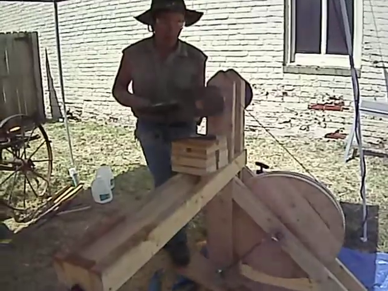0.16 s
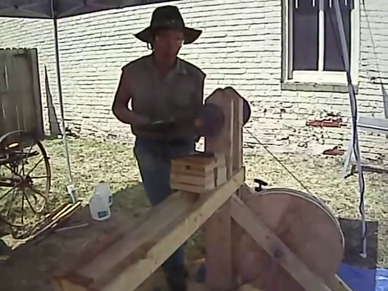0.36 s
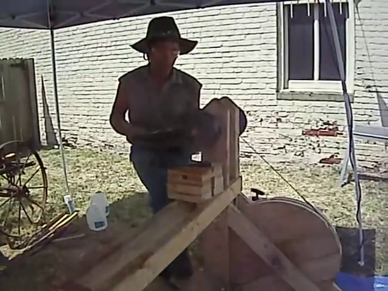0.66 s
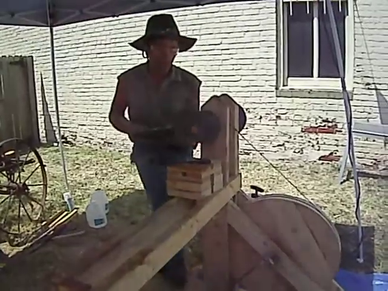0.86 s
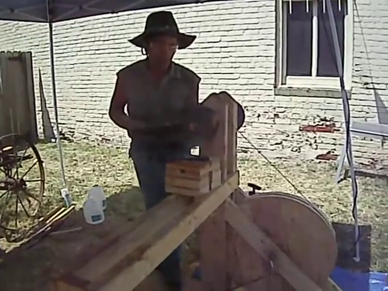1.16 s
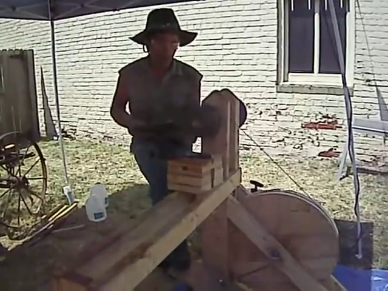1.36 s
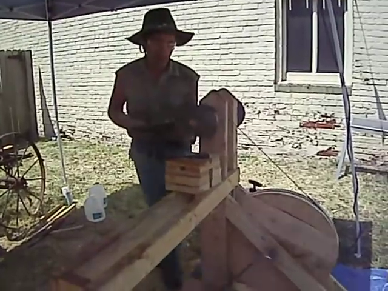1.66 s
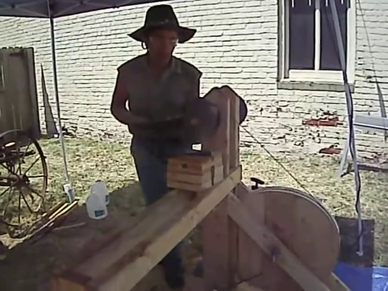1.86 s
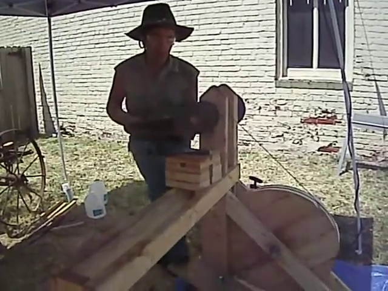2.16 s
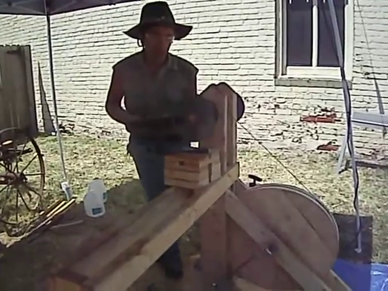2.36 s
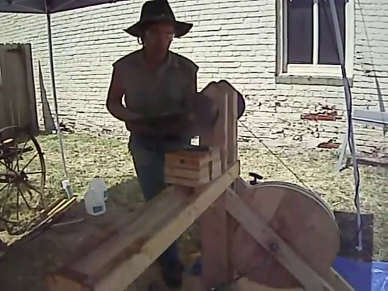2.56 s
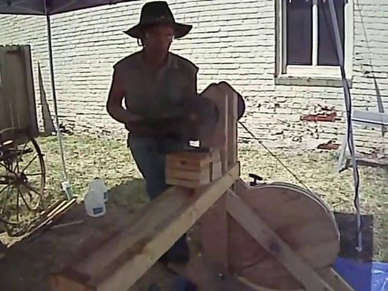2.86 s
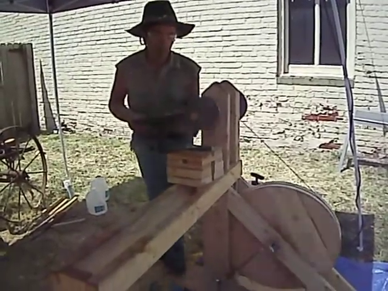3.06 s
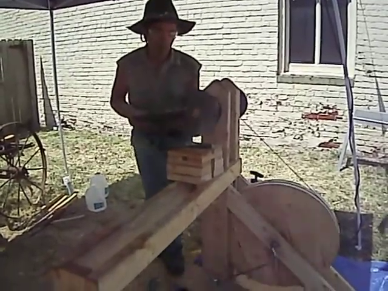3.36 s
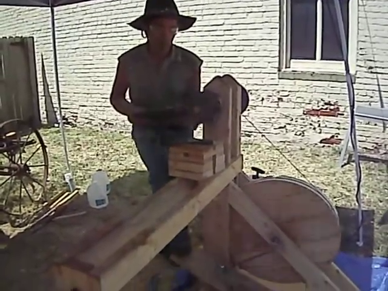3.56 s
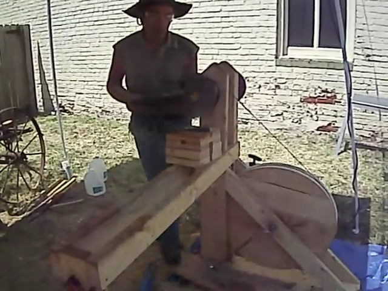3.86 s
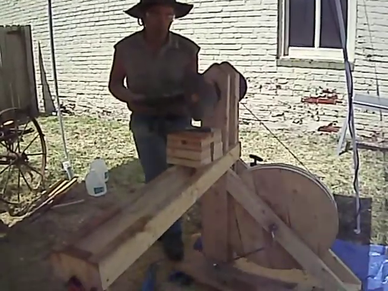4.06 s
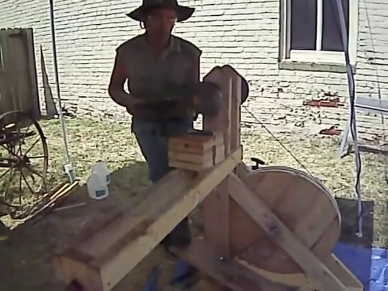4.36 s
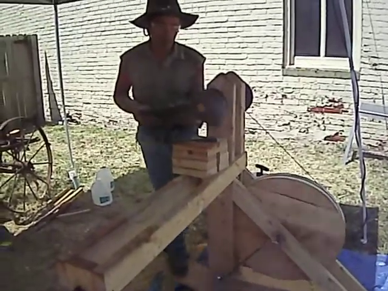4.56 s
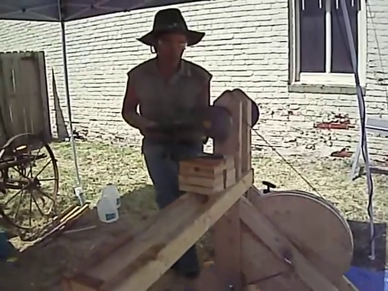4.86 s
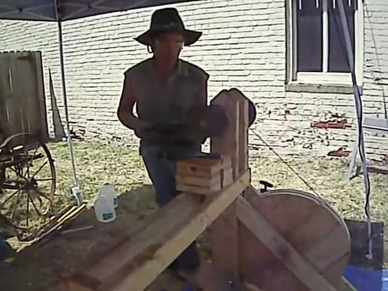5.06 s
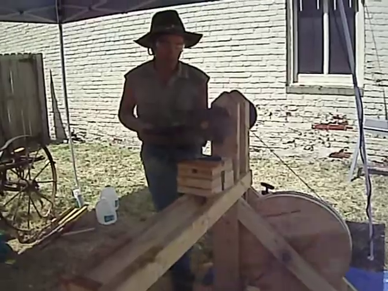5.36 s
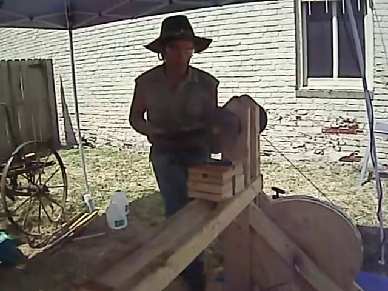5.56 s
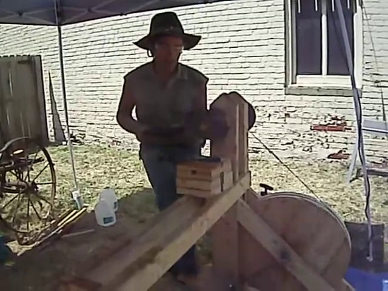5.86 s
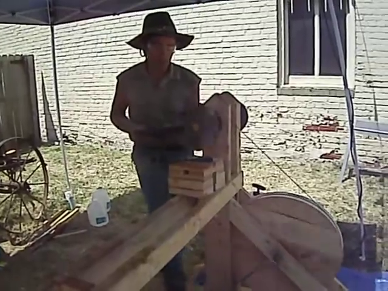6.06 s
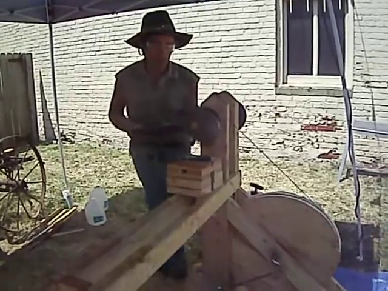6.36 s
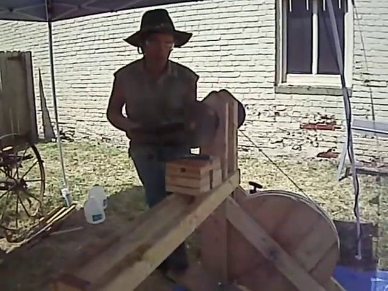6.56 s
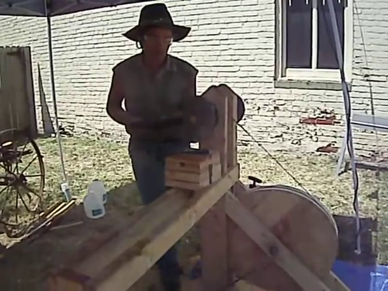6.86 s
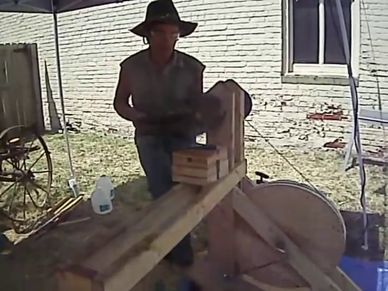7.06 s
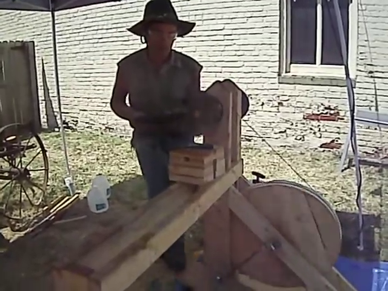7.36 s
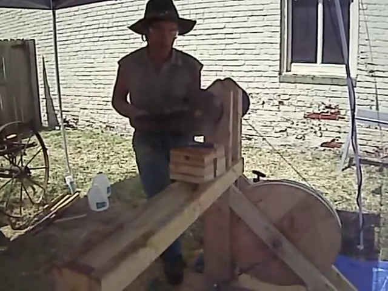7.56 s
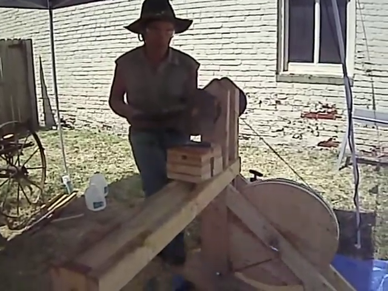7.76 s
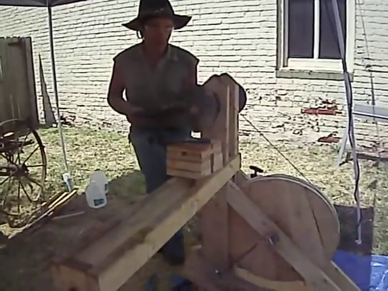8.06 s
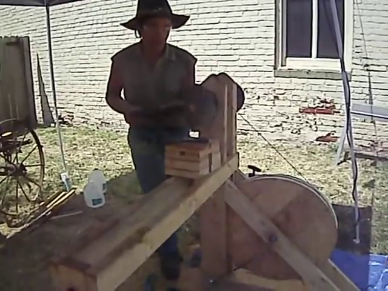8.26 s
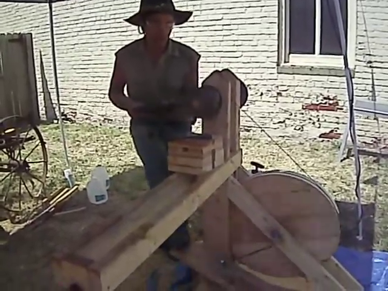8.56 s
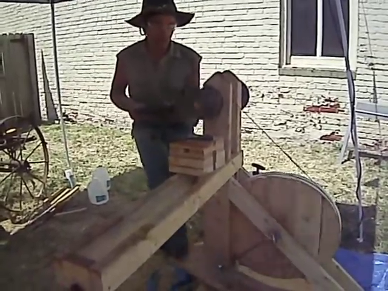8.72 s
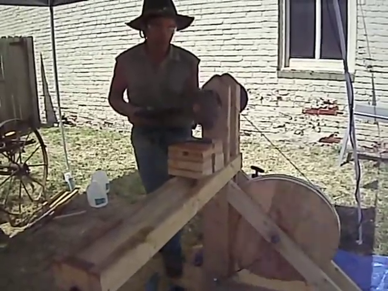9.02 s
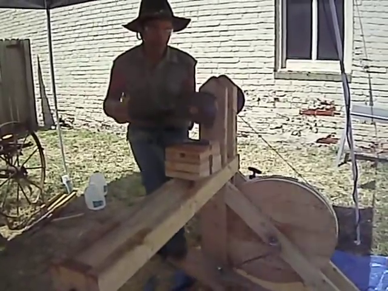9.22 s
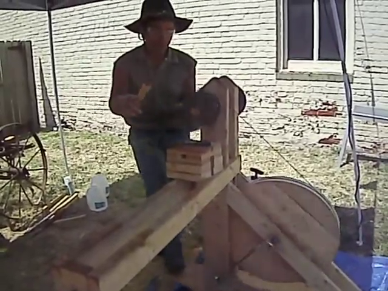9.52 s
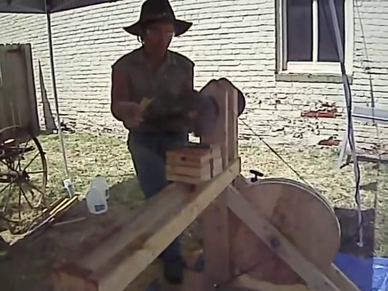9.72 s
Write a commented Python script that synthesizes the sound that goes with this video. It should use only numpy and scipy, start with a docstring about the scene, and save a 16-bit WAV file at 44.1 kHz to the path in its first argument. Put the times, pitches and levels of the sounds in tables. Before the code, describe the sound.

A foot-powered wooden lathe runs in a yard. The treadle gives a dull knock and the loose linkage answers with a sharp clatter, each about every three quarters of a second, over a low rumble and rubbing. A tool scrapes and ticks on the spinning wood, hardest early on, and sometimes slaps its rest with a bright click. Engines drone faintly far off. The sound is narrow and slightly muffled, overloading on the loudest blows.

```python
"""Treadle lathe in a yard

A wooden lathe is worked before a brick wall while engines drone far off. With each turn of the flywheel
the treadle knocks and the loose linkage clatters: impacts excite damped modes of wood and joints.
The tool scrapes and ticks on the spinning work and now and then slaps its rest.
A narrow-band recorder overloads on the blows."""
import sys
import numpy as np
from scipy import signal
from scipy.fft import rfft, irfft
from scipy.io import wavfile
from scipy.ndimage import map_coordinates

SR = 44100
rng = np.random.default_rng(int(sys.argv[2]) if len(sys.argv) > 2 else 0)


def master(y):
    """Save y as 16-bit WAV."""
    cut = np.clip(np.atleast_2d(y).T, -1, 1)
    pcm = np.round(cut * 32767)  # scale
    wavfile.write(sys.argv[1], SR, pcm.astype(np.int16))


N = 436149
TIME = np.arange(N) / SR
BLOW_TIME = TIME[:SR // 4]
SPINDLE_HZ = 12.1

# Levels in all tables are relative; each source adds its own gain.
# treadle knocks: t/s, level/dB, main pitch f/Hz
KNOCKS = [(0.021, 5, 900), (0.48, -7.5, 746), (1.418, 0.5, 730), (2.161, -2, 744), (2.683, -11, 730),
          (2.917, -0.5, 800), (3.629, 5, 923), (4.34, 4.5, 850), (5.032, -3.5, 727), (5.778, -5, 670),
          (6.51, 3, 708), (6.563, -6.5, 840), (7.208, 5.5, 777), (7.936, 6, 870), (8.637, 2, 804),
          (9.622, -6.5, 816)]
# linkage clatters, one a turn: t/s, lead of the joint's clack/s, level of its wood modes/dB
CLATTERS = [(0.321, .019, -17), (1.047, 0.013, -2), (1.775, 0.024, -12), (2.525, 0.028, -21),
            (3.241, .037, -23), (3.952, 0.025, -17), (4.653, 0.023, 8), (5.409, 0.026, -20),
            (6.16, 0.034, 8), (6.853, .0355, 6.5), (7.553, 0.037, 4.5), (8.257, 0.038, 6),
            (8.966, 0.044, 6), (9.681, .0176, -24)]
# steady running: t/s, rumble level/dB, rubbing level/dB
RUNNING = [(0.0, -27, -23), (0.63, -26.5, -24.5), (1.32, -25.5, -21), (1.87, -23.5, -20.5),
           (2.59, -24, -22), (3.22, -26, -18), (4.62, -22, -20.5), (5.29, -25.5, -20.5), (5.73, -26.5, -24),
           (6.25, -28.5, -23.5), (9.45, -28, -26.5), (9.89, -28, -26.5)]


def treadle():
    """Impact excitation: the treadle ends its stroke and its heavily damped modes give a dull knock."""
    # treadle modes: f/Hz, level/dB, T60/s
    modes = [(350, -13, .04), (430, -10, .04), (530, -8, .03), (660, -5, .024), (810, 0, .022),
             (1050, -6, .022), (1500, -14, .02), (2200, -17, .015), (3200, -19, .015)]
    out = np.zeros(N)
    for s, db, hz in KNOCKS:
        body = ring(modes, pitch=np.sqrt(hz / 780))
        add(out, s, amp(db + 1) * strike(body, chatter=0.71, decay_s=0.0044))
    return out


def joints(take_up_db=-2, bounce_db=-6.5, bounce_lead_s=.011):
    """Backlash: a slack joint snaps across its play and rebounds once before each clatter."""
    # stray clacks, most beside a treadle knock: t/s, level/dB, level of the wood modes/dB
    strays = [(3.6152, -7, 5.5), (4.3271, -3, 7), (4.4689, 0, -1.5), (4.8078, -2, 4), (5.0518, -4, 5.5),
              (5.8087, -5, 7), (6.5275, -4.5, -1), (7.2175, 0.5, -31), (7.9279, -3.5, 0)]
    # bright modes of a joint: f/Hz, level/dB, T60/s
    snap_modes = [(1550, -5, .014), (2050, -3, .016), (2650, -4, .014), (3150, 0, .018), (3550, -2, .016),
                  (4000, -4, .01)]
    # its low wood modes: f/Hz, level/dB, T60/s
    wood_modes = [(400, -7, .035), (690, -3, .035), (1120, 0, .022)]
    take_ups = [(s - lead, take_up_db, wood_db) for s, lead, wood_db in CLATTERS]
    bounces = [(s - bounce_lead_s, bounce_db, wood_db) for s, _, wood_db in CLATTERS]
    clacks = take_ups + strays + bounces
    pitches = 1 + 0.078 * rng.standard_normal(len(clacks))
    out = np.zeros(N)
    for (s, db, wood_db), pitch in zip(clacks, pitches):
        snap = strike(ring(snap_modes, pitch), chatter=0.62, decay_s=0.018)
        wood = strike(ring(wood_modes, pitch), chatter=0.9, decay_s=0.0016)
        add(out, s, amp(db - 0.1) * (snap + amp(wood_db - 6.5) * wood))
    return out


def linkage(hold_s=0.0091, drag_lag_s=0.032, drag_width_s=0.029):
    """Dense impacts merge into a noise burst as the linkage slams over; brief sliding friction follows."""
    # spectrum of the contacts: f/Hz, level/dB
    contact_spectrum = [(100, -37), (280, -4.5), (380, 7), (490, 3.5), (620, 2.5), (800, -1.5), (1140, 5.5),
                        (1550, 2.5), (1800, -7), (2130, 6.5), (2600, -2.5), (3130, 2), (4200, -2),
                        (6000, -30.5)]
    # spectrum of the sliding: f/Hz, level/dB
    scrape_spectrum = [(300, -35), (1100, 2.5), (1700, -9.5), (2300, -10.5), (2900, 1), (3600, 0.5),
                       (4300, 0.5), (6000, -17)]
    t = BLOW_TIME - BLOW_TIME[-1] / 3
    slam = np.clip(t / .0012, 0, 1) * np.exp(-np.maximum(t - hold_s, 0) / .005)
    drag = np.exp(-((t - drag_lag_s) / drag_width_s) ** 2)
    slams, drags = np.zeros(N), np.zeros(N)
    for s, _, _ in CLATTERS:
        add(slams, s + t[0], slam)
        add(drags, s + t[0], drag)
    contacts = noise(contact_spectrum)
    scrape = coloured(grains(per_s=3500, spread_db=2.9), scrape_spectrum)
    return amp(-7.5) * slams * contacts + amp(-17) * drags * scrape


def tool_slaps(push_s=0.0019):
    """Momentum transfer: the steel tool bounces on its rest with a bright ring and shoves the frame."""
    # slaps: t/s, ring level/dB, thud level/dB
    slaps = [(1.203, 2.5, -10.5), (1.929, 6, -8), (3.384, 5, -11), (4.105, -3, -38), (5.567, 3, -20)]
    # modes of the tool on its rest: f/Hz, level/dB, T60/s
    modes = [(800, -9, .035), (1400, -6, .012), (2200, -6, .012), (2800, -4, .013), (3200, 0, .018),
             (3480, -4, .018), (4000, -5, .01)]
    u = BLOW_TIME / push_s
    thud = -u * (1 - u / 3) * np.exp(1 - u)
    out = np.zeros(N)
    for s, db, thud_db in slaps:
        steel = strike(ring(modes), chatter=3.4, decay_s=0.0018)
        add(out, s, amp(db) * steel + amp(thud_db - 2) * thud)
    return out


def tool_ticks(small_chips_per_s=1.2, small_chip_range_db=(-25, -16)):
    """Impulses ring the tool: periodic from high spots on the spinning work, irregular from chips."""
    # the largest chips snapping off: t/s, level/dB
    chips = [(0.108, -20), (4.7461, -9.5), (5.242, -12.5), (6.013, -12), (6.7644, -14), (6.9478, -12),
             (6.9935, -19), (8.309, -12.5), (8.3402, -10.5), (9.0808, -16.5), (9.1248, -20.5),
             (9.3412, -23)]
    # high spots, met once a spindle turn: first t/s, last t/s, first level/dB, last level/dB
    high_spots = [(0.094, 0.253, -21, -21.5), (6.604, 6.775, -17, -12.5), (7.284, 7.6155, -16.5, -11.5),
                  (7.7663, 8.185, -23.5, -13.5), (8.4193, 8.749, -17.5, -10), (9.6015, 9.838, -14, -23)]
    # tool modes: f/Hz, level/dB, T60/s
    modes = [(1200, -10, .01), (2400, -7, .008), (3050, -4, .009), (3600, 0, .011), (4100, 2, .009)]
    ticks = list(chips)
    for first, last, first_db, last_db in high_spots:
        count = round((last - first) * SPINDLE_HZ) + 1
        ticks += zip(np.linspace(first, last, count), np.linspace(first_db, last_db, count))
    for s in TIME[rng.random(N) < small_chips_per_s / SR]:
        ticks.append((s, rng.uniform(*small_chip_range_db)))
    pitches = 1 + 0.034 * rng.standard_normal(len(ticks))
    out = np.zeros(N)
    for (s, db), pitch in zip(ticks, pitches):
        add(out, s, amp(db + 8.5) * strike(ring(modes, pitch), chatter=1.0, decay_s=0.0046))
    return out


def cut_depth():
    """Power summation: the feed, a lurch at each clatter and a jolt at each knock set the cut, in dB."""
    # how hard the turner feeds the tool: t/s, level/dB
    feed = [(0, -35), (0.55, -29.5), (1.12, -19), (2.28, -19), (2.66, -27), (3.5, -29), (3.78, -25.5),
            (4.25, -26.5), (4.68, -21), (4.88, -32), (5.25, -23.5), (5.6, -30), (6.45, -33.5), (6.76, -26),
            (6.96, -36.5), (9.89, -33.5)]
    feed_db, = curves(feed)
    lurches = sum(swell(s - .006, rise_s=0.092, fall_s=.05) for s, _, _ in CLATTERS)
    jolts = sum(amp(db / 2) * swell(s, rise_s=.008, fall_s=.13) for s, db, _ in KNOCKS)
    return 10 * np.log10(amp(feed_db + 3.3) ** 2 + (amp(-20) * lurches) ** 2 + (amp(-25) * jolts) ** 2)


def cutting(cut_db):
    """Fracture noise: fibres tear in clumps, most at the end grain, which comes round twice a turn."""
    # spectrum of tearing fibres: f/Hz, level/dB
    spectrum = [(600, -23.5), (1400, -9), (1850, -5), (2200, -1), (2600, -2), (3080, 1.5), (3350, 0),
                (3650, -0.5), (4300, -3)]
    turns = np.cumsum(SPINDLE_HZ * (1 + 0.027 * wander(1.8))) / SR
    bite = np.exp(-(2 * turns % 1) / 0.36)
    skipping = np.interp(cut_db, [-28, -18], [1, .55])  # a light cut skips, a deep one runs more evenly
    flicker_db = np.clip(3.9 * wander(60) + 3 * wander(190), -8, 5)
    clumps_db = skipping * (6 * (bite - bite.mean()) + flicker_db)
    return amp(cut_db + 1.5 + clumps_db) * coloured(grains(per_s=16000, spread_db=1.1), spectrum)


def tool_chatter(cut_db):
    """Resonance: in a deep cut the tool rasps around its natural frequency, in short fits."""
    # resonance of the loaded tool: f/Hz, level/dB
    resonance = [(2400, -24), (2850, -2.5), (3080, 1), (3350, -6), (3900, -18)]
    load = np.clip((cut_db + 24) / 6, 0, 1)
    fits = np.maximum(wander(70) + 0.9, 0)
    return amp(cut_db - 12) * load * fits * noise(resonance)


def running():
    """Random vibration and friction: the frame rumbles and the work rubs, each a wavering noise band."""
    # spectrum of the frame: f/Hz, level/dB
    rumble_spectrum = [(25, -39.5), (60, -19.5), (110, -9), (200, -6), (300, -3.5), (430, 0.5), (700, 1),
                       (950, -1), (1500, -28), (4000, -37)]
    # spectrum of the rubbing: f/Hz, level/dB
    rub_spectrum = [(300, -39), (700, -11.5), (1000, 3), (1250, 1), (1550, -3.5), (1900, -7.5),
                    (2600, -10.5), (4200, -27)]
    rumble_db, rub_db = curves(RUNNING)
    rumble = amp(rumble_db + 1.93 + 0.99 * wander(40)) * noise(rumble_spectrum)
    rub = amp(rub_db + 0.71 + 2.0 * wander(50)) * noise(rub_spectrum)
    return rumble + rub


def far_engine():
    """Harmonic series: low orders of the engine's cycle rate each waver on their way through the air."""
    # cycle rate: t/s, f/Hz
    speed = [(0, 25.3), (1.8, 28.5), (2.03, 26.4), (2.5, 25.5), (3.1, 25.8), (3.6, 23), (4.2, 23),
             (5.3, 25.9), (6.5, 26.6), (9.89, 27.3)]
    # engine strength: t/s, exhaust level/dB, body level/dB
    levels = [(0, -37, -32.5), (.6, -31.5, -31.5), (1.8, -23.5, -25.5), (2.2, -27.5, -18),
              (2.42, -23.5, -23.5), (2.65, -41, -38), (3.1, -34, -45), (3.5, -39.5, -32), (4.3, -41.5, -41),
              (5.6, -27, -34), (6.1, -29.5, -39), (6.5, -27.5, -38.5), (7.2, -33.5, -38),
              (9.89, -37.5, -41.5)]
    # exhaust harmonics: order, level/dB
    exhaust_orders = [(3, -11), (4, -1), (5, -1.5), (6, -1.5)]
    # engine body harmonics: order, level/dB
    body_orders = [(8, -9), (9, -3), (10, -13)]
    hz, = curves(speed)
    exhaust_db, body_db = curves(levels)
    phase = 2 * np.pi * np.cumsum(hz * (1 + .002 * wander(5))) / SR
    out = np.zeros(N)
    for orders, level_db in (exhaust_orders, exhaust_db - 5.5), (body_orders, body_db - 3.5):
        partials = (amp(db + 1.5 * wander(6)) * np.sin(k * phase + .25 * wander(10)) for k, db in orders)
        out += amp(level_db) * unit_rms(sum(partials))
    return out


def far_drone(fade_s=.5):
    """Amplitude modulation: a second far engine enters as one wavering tone, slowly rising in pitch."""
    # course of the tone: t/s, f/Hz, level/dB
    course = [(4.5, 114, -34), (5.5, 123.2, -36.5), (7.8, 127.8, -37.5), (8.5, 128.9, -40.5),
              (9.89, 130.4, -37)]
    hz, db = curves(course)
    fade_in = np.clip((TIME - course[0][0]) / fade_s, 0, 1)
    tone = np.sqrt(2) * np.sin(2 * np.pi * np.cumsum(hz) / SR)
    return amp(db + .8 * wander(8)) * fade_in * tone


def yard(x, wall_s=.021, wall_db=-15, tail_db=-10):
    """Reflection and scattering: one echo from the brick wall and a short diffuse tail join the sound."""
    # reverberation time: f/Hz, T60/s
    decay = [(200, 0.38), (800, 0.15), (2000, 0.14), (4000, 0.11)]
    hz, t, spectra = signal.stft(rng.standard_normal(SR // 3), SR, nperseg=256)
    spectra *= amp(-60 * t / over_log_hz(decay, hz)[:, None])
    _, response = signal.istft(spectra, SR, nperseg=256)
    response *= np.minimum(TIME[:len(response)] / 0.0052, 1)
    response *= amp(tail_db) / np.linalg.norm(response)
    response[round(wall_s * SR)] += amp(wall_db)
    return x + signal.fftconvolve(x, response)[:N]


def ring(modes, pitch=1):
    """Modal superposition: damped sines, slightly detuned for each blow; peak 1."""
    shifts = pitch * rng.uniform(.95, 1.05, len(modes))
    x = sum((-1) ** k * amp(db - 60 * BLOW_TIME / t60) * np.sin(2 * np.pi * hz * shifts[k] * BLOW_TIME)
            for k, (hz, db, t60) in enumerate(modes))
    return x / abs(x).max()


def strike(body, chatter, decay_s):
    """Convolution: a firm contact and a dying chatter of smaller ones drive a body's response; peak 1."""
    force = rng.standard_normal(len(BLOW_TIME)) * np.exp(-BLOW_TIME / decay_s)
    force *= chatter / np.linalg.norm(force)
    force[0] += 1
    x = signal.fftconvolve(force, body)[:len(force)]
    return x / abs(x).max()


def grains(per_s, spread_db):
    """Shot noise: a dense random train of clicks of uneven size."""
    sizes = rng.standard_normal(N) * amp(spread_db * np.minimum(rng.exponential(1, N), 4))
    return sizes * (rng.random(N) < per_s / SR)


def noise(spectrum):
    """Gaussian noise with a given spectrum, at rms 1."""
    return coloured(rng.standard_normal(N), spectrum)


def coloured(x, spectrum):
    """Spectral shaping of x, at rms 1."""
    gain = amp(over_log_hz(spectrum, np.fft.rfftfreq(len(x), 1 / SR)))
    return unit_rms(irfft(rfft(x) * gain, len(x)))


def wander(hz):
    """Random modulation of rms 1, changing about hz times a second."""
    knots = rng.standard_normal(4096)
    return unit_rms(map_coordinates(knots, [TIME * hz], order=1, mode="wrap"))


def swell(s, rise_s, fall_s):
    """Exponential growth to 1 at time s, then exponential decay."""
    return np.exp(-np.maximum((s - TIME) / rise_s, (TIME - s) / fall_s).clip(0, 20))


def curves(rows):
    """Linear interpolation of each column over time."""
    s, *columns = np.transpose(rows)
    return [np.interp(TIME, s, column) for column in columns]


def over_log_hz(points, hz):
    """Linear interpolation over log frequency."""
    f, value = np.transpose(points)
    return np.interp(np.log(hz + 1), np.log(f), value)


def amp(db):
    """Decibels to amplitude ratio."""
    return 10 ** (np.asarray(db) / 20)


def unit_rms(x):
    """Normalisation to rms 1."""
    return x / np.sqrt(np.mean(x ** 2) + 1e-20)


def add(mix, s, sound):
    """Superposes a sound on the mix at time s."""
    part = mix[max(round(s * SR), 0):][:len(sound)]
    part += sound[:len(part)]


def lowpass(x, hz, taps):
    """A steep zero-phase low-pass."""
    return signal.oaconvolve(x, signal.firwin(taps, hz, window=("kaiser", 9), fs=SR)[None], "same")


def scene():
    """Superposition: the lathe's blows and their echoes, over its running noise and the far engines."""
    cut_db = cut_depth()
    steady = running() + cutting(cut_db) + tool_chatter(cut_db) + far_engine() + far_drone()
    blows = treadle() + joints() + linkage() + tool_slaps() + tool_ticks()
    return (yard(blows) + steady)[None]


def record(dry, band_hz=3998, preamp_ceiling=.78, full_scale=.71, knee=0.021, spit_db=-8):
    """Nonlinear distortion: in a narrow-band recorder loud blows gain a low thud and spit treble."""
    narrow = lowpass(dry, band_hz, taps=171)
    # the preamp overloads on positive peaks only, which makes the thud
    lopsided = narrow - lowpass(np.maximum(narrow - preamp_ceiling, 0), hz=530, taps=101)
    linear = np.clip(lopsided, knee - full_scale, full_scale - knee)
    clipped = linear + knee * np.tanh((lopsided - linear) / knee)
    body = lowpass(clipped, hz=4700, taps=171)
    spit = clipped - body  # clipping products above the band
    return lowpass(body + amp(spit_db) * spit, hz=16000, taps=511)


dry = scene()
out = record(dry)
master(out)
```